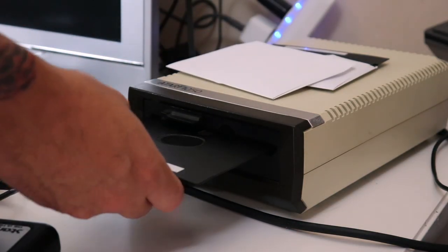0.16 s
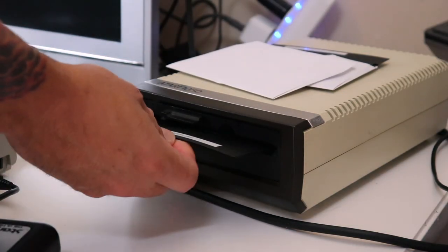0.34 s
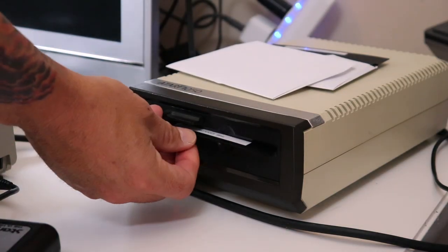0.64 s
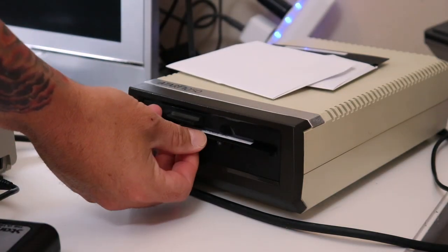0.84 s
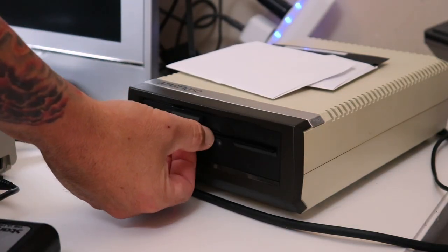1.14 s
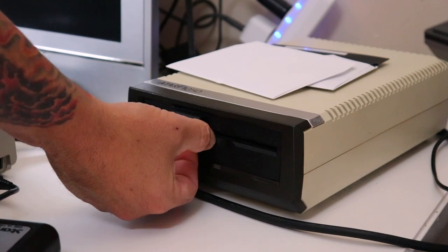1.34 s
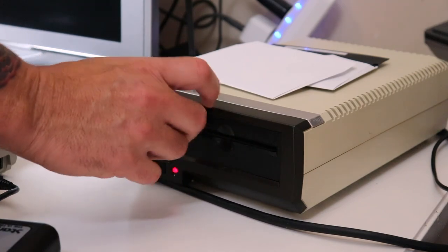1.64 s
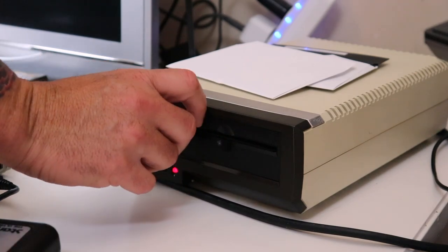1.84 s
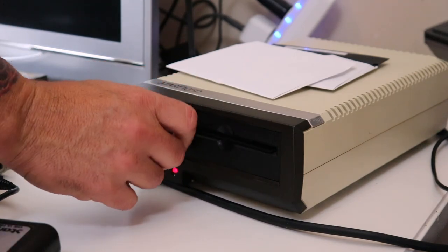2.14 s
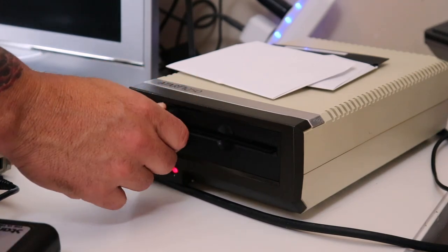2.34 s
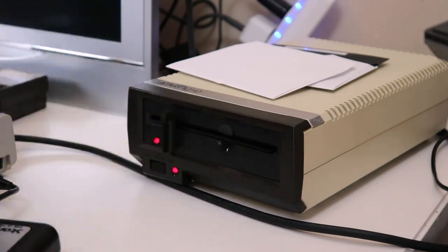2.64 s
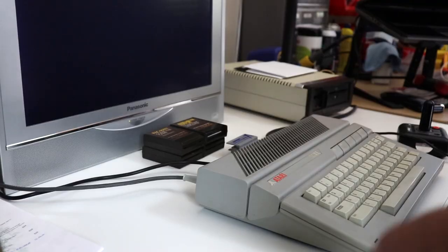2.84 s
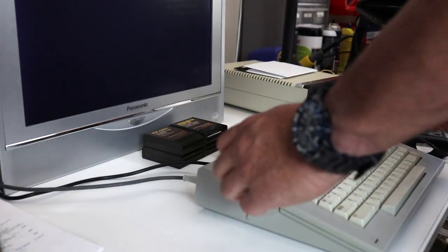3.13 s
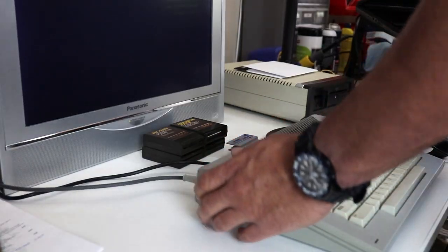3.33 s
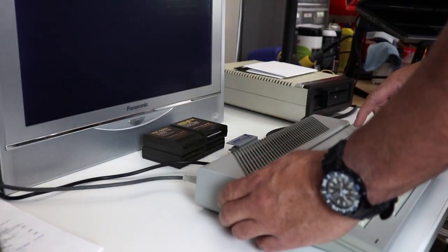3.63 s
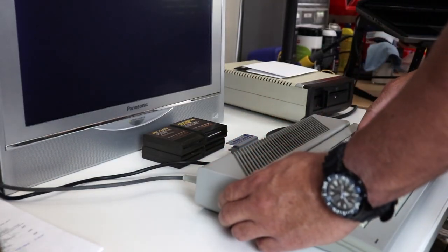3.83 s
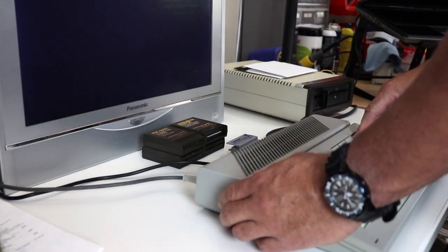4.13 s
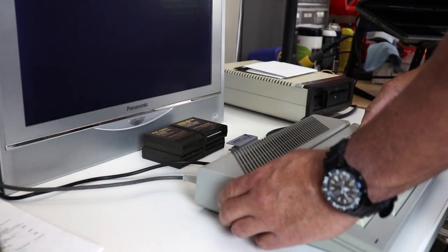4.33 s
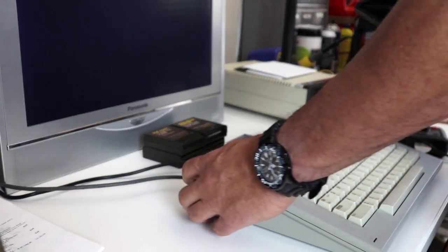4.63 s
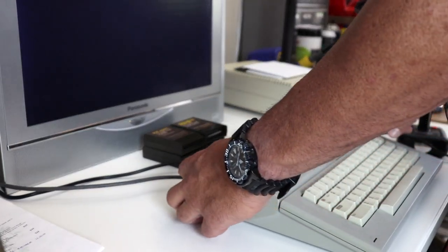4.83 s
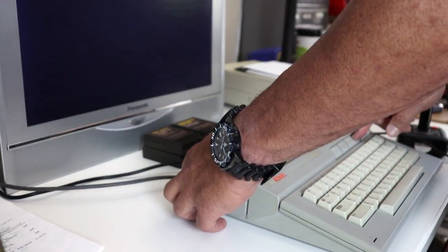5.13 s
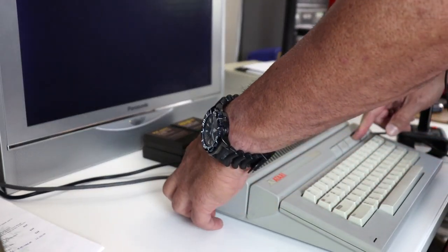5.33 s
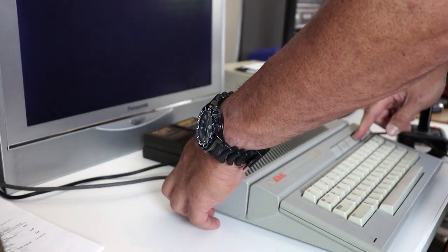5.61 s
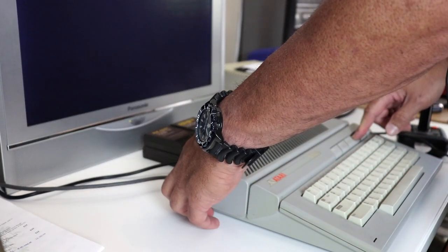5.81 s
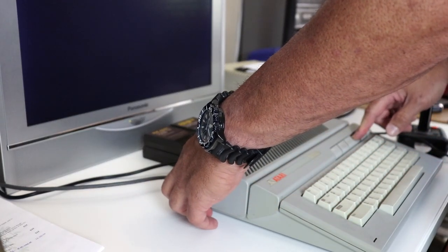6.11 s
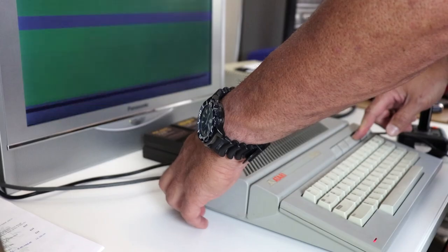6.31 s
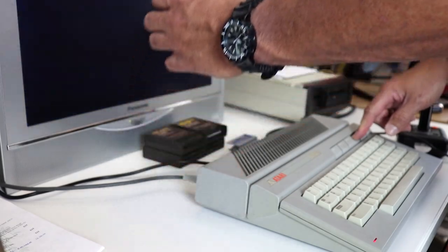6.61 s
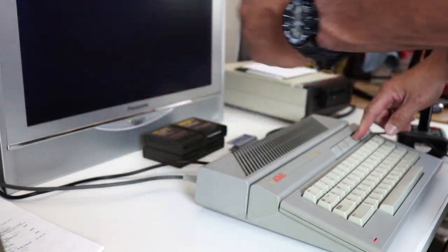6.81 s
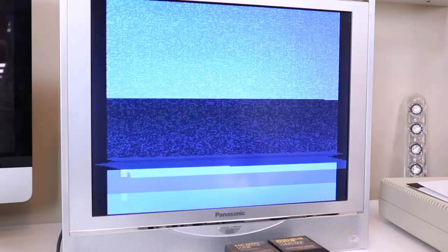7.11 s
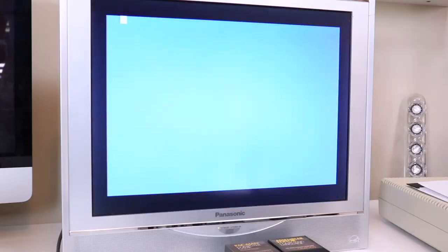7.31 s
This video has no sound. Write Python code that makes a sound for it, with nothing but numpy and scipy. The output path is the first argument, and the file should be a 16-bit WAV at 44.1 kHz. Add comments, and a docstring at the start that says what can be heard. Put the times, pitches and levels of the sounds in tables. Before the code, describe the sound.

Sharp plastic clicks and knocks of a disk drive, then a ragged piercing whine fades above quiet hum until a steadier screen whine takes over.

```python
"""In a small room, a floppy disk is pushed into a desktop drive, the latch turned and the drive switched on.
Struck modes make the clicks and knocks, band noise the rubbing, swelling tones the short judders of the
jacket and two faint long whistles. A thin whine from 11.35 kHz, an oscillator that turns ragged in spells,
hunts while a home computer is handled. Under it lie a soft whir of shaped noise and mains hum. Near the end
a monitor takes over from whir and whine, with a louder, steadier whine near 12 kHz over swelling hiss."""
import sys
import numpy as np
from scipy import signal
from scipy.fft import rfft, irfft, next_fast_len
from scipy.io import wavfile

SR = 44100
rng = np.random.default_rng(int(sys.argv[2]) if len(sys.argv) > 2 else 0)


def unload_wav(signal):
    """Save mono or channel-first audio to the path in sys.argv[1] as 16-bit WAV at rate SR, clipped to [-1, 1]."""
    wavfile.write(
        sys.argv[1],
        SR,
        np.round(np.clip(np.atleast_2d(signal).T, -1, 1) * 32767).astype(np.int16),
    )


N = 328986
TIME = np.arange(N) / SR   # s
MONITOR_S, HANDOVER_S = 7.135, 0.013   # the monitor takes over from whir and whine


def from_db(db):
    """Decibels to gain."""
    return 10 ** (np.asarray(db) / 20)


def rms_one(x):
    """Scale to rms 1."""
    return x / np.sqrt(np.mean(x ** 2) + 1e-30)


def in_time(rows):
    """Columns of a curve at every sample."""
    s, *columns = np.transpose(rows)
    return [np.interp(TIME, s, c) for c in columns]


def band(x, low_hz, high_hz, order=2):
    """Butterworth band-pass."""
    sos = signal.butter(order, [low_hz, min(high_hz, .45 * SR)], "band", fs=SR, output="sos")
    return signal.sosfilt(sos, x)


def ramp(start_s, length_s):
    """Rises from 0 to 1."""
    return np.clip((TIME - start_s) / max(length_s, 1e-4), 0, 1)


def envelope(start_s, end_s, attack_s, release_s):
    """Attack, hold and release, 0-1."""
    return ramp(start_s, attack_s) * (1 - ramp(end_s - release_s, release_s))


def waver(per_s):
    """Smooth chance of rms 1 that takes per_s new values a second."""
    steps = np.cumsum(np.ones(N) * per_s) / SR
    return rms_one(np.interp(steps, np.arange(N // 4), rng.standard_normal(N // 4)))


def spin(hz):
    """Unit phasor on a pitch curve."""
    return np.exp(2j * np.pi * np.cumsum(hz * np.ones(N)) / SR)


def tone(hz):
    """Sine of rms 1 on a pitch curve."""
    return np.sqrt(2) * spin(hz).imag


def room(x, t60=0.14, wet_db=-10, dull_hz=5000, width=0.052):
    """Desk and near walls answer with a short tail of decaying noise, almost alike in both channels."""
    t = TIME[:SR // 3]
    decay = np.exp(-np.log(1000) * t / t60) * (t > .004)
    mid, side = band(rng.standard_normal((2, len(t))), 200, dull_hz, order=1) * decay
    tail = (mid + width * np.outer([1, -1], side)) / np.linalg.norm(mid)
    return x + from_db(wet_db) * signal.fftconvolve(x[None], tail, axes=1)[:, :N]


# stereo width of the noise beds: (frequency [Hz], side re mid [dB])
NOISE_WIDTH = [(30, -12), (110, -18.5), (380, -17), (900, -15), (2000, -21.5), (4000, -35), (15000, -78)]


def wide(spectrum):
    """Stereo noise of a given spectrum, a little wide in the bass and centred in the treble."""
    hz, db = np.transpose(spectrum)
    width_hz, width_db = np.transpose(NOISE_WIDTH)
    size = next_fast_len(N)
    log_hz = np.log(np.maximum(np.arange(size // 2 + 1) * SR / size, 1))
    mid, side = rfft(rng.standard_normal((2, size))) * from_db(np.interp(log_hz, np.log(hz), db))
    side = side * from_db(np.interp(log_hz, np.log(width_hz), width_db))
    return rms_one(irfft([mid + side, mid - side], size)[:, :N])


# loudness of the whir before its band trims: (time [s], level [dB])
WHIR_LEVEL = [(0.0, -55), (0.61, -57), (1.8, -62), (2.3, -61.5), (2.68, -64), (3.77, -64.5), (4.56, -65.5),
              (5.73, -72), (6.78, -72), (7.12, -64.5)]
# spectrum of the whir: (frequency [Hz], relative level [dB])
WHIR_SPECTRUM = [(15, -46), (25, -24), (86, -5.5), (110, -2.5), (152, 0), (240, 0), (378, -2.5),
                 (523, -4.5), (762, -9), (1200, -10), (4150, -14.5), (9550, -18), (11200, -21.5),
                 (13500, -21.5), (15500, -24)]
# mains hum, before it wavers and follows the whir up and down: (frequency [Hz], level [dB])
MAINS_HUM = [(119.9, -73.5), (239.8, -77.5)]


def whir(low_db=0.17, middle_db=0.22, hiss_db=0.37):
    """Running machines: a low whir with mains hum, and a soft hiss above it."""
    level, = in_time(WHIR_LEVEL)
    air = wide(WHIR_SPECTRUM)
    # trim [dB], band edges [Hz], core that sets the loudness [Hz]
    bands = [(low_db, (20, 650), (60, 450)),
             (middle_db, (650, 3200), (900, 3000)),
             (hiss_db, (3200, 19000), (3500, 9500))]
    out = 0
    for db, edges, core in bands:
        loudness = np.std(band(air[0], *core, order=3))
        out = out + from_db(level + db) * band(air, *edges, order=3) / loudness
    hum = sum(from_db(db + 3.4 * waver(12)) * tone(hz + 1.51 * waver(10)) for hz, db in MAINS_HUM)
    hum = hum * from_db(level - np.mean(level))
    return (1 - ramp(MONITOR_S - HANDOVER_S, HANDOVER_S)) * (out + hum)


WAVERS_PER_S_PER_HZ = 3.4   # the wider it wavers, the faster


def oscillator(hz, waver_hz, clean, flutter_db, skew=0.089, knee=0.24):
    """An unsteady oscillation in the electronics: a clean tone that can break up into narrow hiss."""
    per_s, clean = WAVERS_PER_S_PER_HZ * waver_hz, np.clip(clean, 0, 1)
    swing = 0.69 * waver(per_s * 1.5) + .5 * waver(per_s * 4)
    swing = swing + skew * (swing ** 2 - np.mean(swing ** 2))   # it leaps further up than down
    steady = spin(hz + (10 + (1 - clean) * waver_hz / 3) * waver(250))
    ragged = spin(hz + waver_hz * swing)
    swirl = np.sqrt(clean) * steady + np.sqrt(1 - clean) * ragged
    held = rms_one((swirl / np.hypot(abs(swirl), knee)).imag)   # it saturates, so its height stays even
    return from_db(flutter_db * np.minimum(waver(per_s * 2), 1)) * held


def placed(x, pan_db, side_db=-21):
    """Panned, plus a faint copy one sample later with opposite sign in the two channels."""
    reflected = from_db(side_db) * np.roll(x, shift=1)
    return x * from_db(np.outer([.5, -.5], pan_db)) + np.outer([1, -1], reflected)


def side_tones(rows, edge_s=.0078):
    """Weak wavering tones that come and go."""
    out = 0
    for start, end, first_hz, last_hz, waver_hz, db in rows:
        glide = np.interp(TIME, [start, end], [first_hz, last_hz])
        sound = tone(glide + waver_hz * waver(900))
        out = out + from_db(db) * envelope(start, end, edge_s, edge_s) * sound
    return out


SPIT_START_S, SPIT_END_S, SPITS_PER_S = 4.7, 6.87, 35
SPIT_HZ, SPIT_WIDTH_HZ, SPIT_LENGTH_S = 11670, 1000, 0.0033
SPIT_START_DB, SPIT_GROWTH_DB = -66, 8   # ever harder


def spits(scatter_db=4):
    """Tiny random bursts of hiss just above the resting pitch of the whine."""
    scatter = from_db(scatter_db * np.clip(rng.standard_normal(N), -2, 2))
    born = (rng.random(N) < SPITS_PER_S / SR) * scatter
    bursts = signal.lfilter([1], [1, -np.exp(-1 / (SPIT_LENGTH_S * SR))], born + 1e-18)
    low_hz, high_hz = SPIT_HZ - SPIT_WIDTH_HZ / 2, SPIT_HZ + SPIT_WIDTH_HZ / 2
    hiss = rms_one(band(rng.standard_normal(N), low_hz, high_hz, order=1))
    growth = ramp(SPIT_START_S, SPIT_END_S - SPIT_START_S) ** 2
    level = from_db(SPIT_START_DB + SPIT_GROWTH_DB * growth)
    return (TIME > SPIT_START_S) * (TIME < SPIT_END_S) * level * bursts * hiss


# the whine before spells, sags and flutter: (time [s], level [dB], left re right [dB])
WHINE_STRENGTH = [(2.76, -38.5, 1.5), (3.99, -39, 0.5), (4.41, -41.5, 3.0), (4.98, -45, 3.0),
                  (5.1, -48, 4.0), (5.76, -57, 1.5), (6.6, -61, 1)]
# spells in which it jumps up and turns ragged: (start [s], end [s], edge [s], raggedness [0-1],
# pitch rise [Hz], waver [Hz], flutter [dB], swell [dB])
RAGGED_SPELLS = [(2.805, 3.43, .03, 1, 440, 450.5, 1, 0), (4.011, 4.614, 0.01, 1, 600, 244.8, 2.5, 0),
                 (6.631, 6.899, 0.037, 0.8, 22, 397, 5, 1), (6.872, 7.134, 0.0082, 1, 740, 252, 3.5, 20)]
# its pitch sags for an instant: (time [s], drop [Hz], swell [dB], length [s])
PITCH_SAGS = [(3.414, 690, -3, 0.0033), (3.923, 452, -3.5, 0.0062), (4.953, 353, -5, 0.0041),
              (5.463, 470, 11, 0.0021), (5.971, 846, 3.5, 0.0042), (6.485, 496, 6.5, 0.0056)]
# weak tones below the whine: (start [s], end [s], first pitch [Hz], last pitch [Hz], waver [Hz], level [dB])
LOWER_SIDE_TONES = [(2.738, 2.837, 7860, 7100, 186, -62.5), (3.432, 4.01, 7200, 7100, 220, -69),
                    (4.612, 6.607, 7400, 7500, 310, -74.5)]
MIRROR_DB = -1.5   # upper side tone re the lower
WHINE_START_S, WHINE_ATTACK_S = 2.733, 0.0071
REST_HZ, REST_WAVER_HZ, REST_FLUTTER_DB = 11350, 129, 1.4
SAG_WAVER_HZ = 349   # extra waver while it sags
CLEAN_WHEN_LOUD, CLEANER_PER_DB = 0.516, 0.34   # clean share 0-1; it steadies as it fades


def whine():
    """The whine rests on one pitch and slowly fades; in spells it jumps up, ragged, and at times it sags."""
    db, pan_db = in_time(WHINE_STRENGTH)
    hz, waver_hz, flutter_db = REST_HZ, REST_WAVER_HZ, REST_FLUTTER_DB
    clean = CLEAN_WHEN_LOUD + CLEANER_PER_DB * (db.max() - db)
    for start, end, edge_s, ragged, rise_hz, spell_waver_hz, spell_flutter_db, swell_db in RAGGED_SPELLS:
        on = envelope(start, end, edge_s, edge_s)
        hz, db, clean = hz + rise_hz * on, db + swell_db * on, clean * (1 - ragged * on)
        waver_hz = waver_hz + on * (spell_waver_hz - waver_hz)
        flutter_db = flutter_db + on * (spell_flutter_db - flutter_db)
    for s, drop_hz, swell_db, length_s in PITCH_SAGS:
        sag = np.exp(-np.minimum(((TIME - s) / length_s) ** 2, 20))
        hz, db = hz - drop_hz * sag, db + swell_db * sag
        clean, waver_hz = clean * (1 - sag), waver_hz + SAG_WAVER_HZ * sag
    sounding = envelope(WHINE_START_S, MONITOR_S + HANDOVER_S, WHINE_ATTACK_S, HANDOVER_S)
    main = sounding * from_db(db) * oscillator(hz, waver_hz, clean, flutter_db)
    # each side tone is mirrored above the resting pitch
    mirrored = [(start, end, 2 * REST_HZ - first, 2 * REST_HZ - last, spread, side_db + MIRROR_DB)
                for start, end, first, last, spread, side_db in LOWER_SIDE_TONES]
    beside = side_tones(LOWER_SIDE_TONES) + side_tones(mirrored) + spits()
    return placed(main + beside, pan_db)


# spectrum of the monitor's hiss: (frequency [Hz], relative level [dB])
MONITOR_SPECTRUM = [(18, -76), (30, -40), (126, -15), (532, -19.5), (767, -20), (897, -22.5), (2360, -28),
                    (10700, -25), (11600, -22), (12900, -18.5), (15500, -27)]
# weak tones of the monitor: (start [s], end [s], first pitch [Hz], last pitch [Hz], waver [Hz], level [dB])
MONITOR_SIDE_TONES = [(7.15, 7.47, 10080, 10200, 160, -56.5), (7.19, 7.47, 3950, 4210, 240, -62.5),
                      (7.17, 7.47, 5600, 6250, 330, -63.5)]
MONITOR_HZ, MONITOR_WAVER_HZ, MONITOR_CLEAN, MONITOR_FLUTTER_DB = 11998, 115, 0.99, 0.7
MONITOR_WHINE_DB, MONITOR_PAN_DB, MONITOR_ATTACK_S = -31, 1, 0.031
HISS_DB, HISS_RISE_DB, HISS_RISE_S = -44.5, 16, .14   # swells towards a steady level


def monitor(lumpy_db=3.0):
    """Beside the monitor: a steadier whine over a swelling hiss in which each region flickers by itself."""
    age = np.maximum(TIME - MONITOR_S, 0)
    swell = from_db(HISS_DB - HISS_RISE_DB * np.exp(-age / HISS_RISE_S))
    near = wide(MONITOR_SPECTRUM)
    regions = [20, 400, 1200, 3200, 5000, 8000, 19000]   # Hz
    hiss = swell * sum(from_db(lumpy_db * waver(45)) * band(near, low, high, order=3)
                       for low, high in zip(regions, regions[1:]))
    whistle = oscillator(MONITOR_HZ, MONITOR_WAVER_HZ, MONITOR_CLEAN, MONITOR_FLUTTER_DB)
    tones = from_db(MONITOR_WHINE_DB) * whistle + side_tones(MONITOR_SIDE_TONES)
    return ramp(MONITOR_S, MONITOR_ATTACK_S) * (hiss + placed(tones, MONITOR_PAN_DB))


# fingers and disk jacket rub on the case: (start [s], attack [s], release [s], level [dB], resonance [Hz])
CASE_RUBS = [(1.03, 0.09, .03, -51.5, 540), (2.497, .008, 0.24, -49, 745), (7.345, .012, 0.032, -54, 756),
             (7.41, .05, .05, -58, 840)]


def rubbing(width_hz=130):
    """Friction keeps one broad resonance of the case sounding: slow noise shifted up to its pitch."""
    grain = band(rng.standard_normal((2, N)), 0.76, width_hz, order=2)
    out = 0
    for s, attack_s, release_s, db, hz in CASE_RUBS:
        shifted = ((grain[0] + 1j * grain[1]) * spin(hz)).real
        resonance = rms_one(band(shifted, 360, 2400))
        out = out + from_db(db) * envelope(s, s + attack_s + release_s, attack_s, release_s) * resonance
    return out


# short judders of the jacket, then two faint long whistling tones near 505 and 1000 Hz:
# (start [s], length [s], centre pitch [Hz], level at the crest [dB])
JUDDERS_AND_WHISTLES = [(0.485, 0.023, 532.6, -35.5), (0.502, 0.057, 529, -38.5), (0.558, 0.039, 530, -53),
                        (0.592, 0.014, 545, -42.5), (1.39, 0.47, 507.3, -60.5), (1.418, 0.38, 997, -65.5)]


def judders_and_whistles(waver_hz=28, rough_db=1.5):
    """Rough wavering tones that swell and fade: short judders of the jacket, then two faint long whistles."""
    out = 0
    for s, length_s, hz, db in JUDDERS_AND_WHISTLES:
        swell = np.sin(np.pi * np.clip((TIME - s) / length_s, 0, 1))
        out = out + swell * from_db(db + rough_db * waver(200)) * tone(hz + waver_hz * waver(200))
    return out


def ring(push, hz, t60):
    """One decaying mode."""
    r, w = np.exp(-np.log(1000) / (t60 * SR)), 2 * np.pi * hz / SR
    return signal.lfilter([0, np.sin(w)], [1, -2 * r * np.cos(w), r * r], push + 1e-18)


def register_levels(registers, knock_db, click_db, click_hz, dullness_db, below_db):
    """The lowest register carries the knock; the others fall away on both sides of the one that clicks."""
    steps = np.arange(1, len(registers) - 1) - (np.searchsorted(registers, click_hz) - 1)
    return [knock_db, *(click_db - np.where(steps > 0, dullness_db, below_db) * abs(steps))]


def contacts(hits, modes, registers, focus_db, favour_db, grit, rise_s, dense_db, dense_t60, below_db):
    """Each contact is a push and a short chatter; the place that is struck picks the modes that ring most."""
    out, t = np.zeros(N + SR), TIME[:SR // 4]
    for s, low_ring, high_ring, ring_length, chatter_s, knock_db, click_db, dullness_db in hits:
        strengths = register_levels(registers, knock_db, click_db, high_ring, dullness_db, below_db)
        push = grit * rng.standard_normal(len(t)) * np.exp(-t / max(chatter_s, 1e-4))
        push[0] += 1
        for db, low, high in zip(strengths, registers, registers[1:]):
            sound = 0
            for k, (hz, mode_db, t60) in enumerate(modes):
                if low <= hz < high:
                    favour = favour_db * np.exp(-(10 * np.log2(hz / high_ring)) ** 2)
                    loss = focus_db * min(abs(np.log2(hz / low_ring)), .5)
                    gain = (-1) ** k * from_db(mode_db + favour - loss)   # signs alternate
                    sound = sound + gain * ring(push, hz, t60 * ring_length)
            # countless weak modes fill the gaps, more of them towards the treble
            dense = band(rng.standard_normal(len(t)), low * 1.2, high * .93, order=3)
            dense = rms_one(dense * from_db(-60 * t / dense_t60))
            sound = rms_one(sound) + from_db(dense_db) * min(low / 2000, 1) * dense
            sound = sound * (1 - np.exp(-t / rise_s))   # the panels take a moment to build up
            sound = band(sound, low, 2 * high)   # small panels radiate no bass
            at = round(s * SR)
            out[at:at + len(t)] += from_db(db) * sound / np.std(sound[:SR // 32])
    return out[:N]


# contacts on the computer: (time [s], low ring [Hz], high ring [Hz], ring length [factor], chatter [s],
# knock level [dB], click level [dB], dullness [dB per register above the click])
COMPUTER_CONTACTS = [(3.0, 705, 1900, .56, .0035, -60.5, -81, 2),
                     (3.933, 870, 2400, 0.46, 0.0063, -58.5, -65, 2),
                     (4.94, 1010, 2400, 0.49, .0022, -70, -77, 4),
                     (6.253, 1200, 3250, .76, 0.0026, -69.5, -70, 0),
                     (6.274, 1250, 1880, 1, 0.0022, -67, -50.5, 5),
                     (6.4375, 1050, 1700, 0.76, 0.003, -47.5, -82, 0),
                     (6.931, 900, 4700, .43, 0.0016, -82, -61, 0),
                     (7.112, 900, 3080, 1, 0.00094, -84, -54, 0)]
# computer shell and keys: (frequency [Hz], relative level [dB], t60 before the ring length factor [s])
COMPUTER_SHELL = [(720, -1, 0.054), (915, -3, 0.026), (1068, 3.5, 0.022), (1110, 4.5, 0.019),
                  (1230, -5.5, 0.078), (1710, 6.5, 0.023), (1890, -6.5, 0.055), (2030, 1, 0.047),
                  (2370, 6, 0.025), (2860, 11, 0.011), (3130, 11, 0.015), (4750, 2, 0.025),
                  (5270, -22, 0.0047)]
# register edges: (frequency [Hz])
COMPUTER_EDGES = [500, 1450, 2600, 6500]


def computer_handling():
    """Contacts ring the shell and keys of the computer."""
    return contacts(COMPUTER_CONTACTS, COMPUTER_SHELL, COMPUTER_EDGES, focus_db=29.5, favour_db=8,
                    grit=0.12, rise_s=0.00062, dense_db=-7.0, dense_t60=0.014, below_db=15)


# contacts on the drive: (time [s], low ring [Hz], high ring [Hz], ring length [factor], chatter [s],
# knock level [dB], click level [dB], dullness [dB per register above the click])
DRIVE_CONTACTS = [(.312, 786, 4850, 0.35, 0.0029, -49.5, -58, 14.5),
                  (.325, 526, 5270, .57, 0.0045, -52, -46, 27),
                  (.332, 744, 2150, 0.79, 0.0026, -51.5, -44.5, 16),
                  (.3495, 720, 2800, 0.32, 0.0045, -49, -42, 3),
                  (.621, 554, 2080, 0.91, 0.0037, -54, -53.5, 17),
                  (.756, 754, 4080, .4, 0.0025, -45, -52.5, 14),
                  (.760, 803, 1650, .8, 0.0032, -44.5, -39, 11),
                  (1.332, 730, 2540, 0.29, 0.0086, -63, -46.5, 4),
                  (1.339, 730, 7770, 0.31, 0.016, -57, -43.5, -6),
                  (1.517, 523, 1780, 0.72, 0.0092, -62, -57.5, 7),
                  (1.823, 470, 1310, .7, 0.0053, -49.5, -75, 9), (1.825, 648, 1300, 1, 0.0042, -43, -75, 7),
                  (1.854, 650, 1300, 0.84, 0.0043, -44.5, -75, 7),
                  (2.065, 620, 2190, 0.58, 0.028, -68, -54, 16), (2.111, 605, 4670, 1, .005, -70, -59, 9),
                  (2.3615, 624, 2940, .27, 0.0037, -43, -41, 10.5),
                  (2.364, 520, 2210, 0.3, 0.0017, -46, -39.5, 12.5),
                  (2.370, 646, 1480, .8, 0.0026, -44.5, -44.5, 5)]
# drive case and latch: (frequency [Hz], relative level [dB], t60 before the ring length factor [s])
DRIVE_CASE = [(395, -4, .05), (460, -4, .06), (520, 0, .09), (590, -4, .05), (650, 1, .08), (730, -4, .05),
              (810, -4, .06), (1050, -8, .03), (1340, -6, .04), (1495, -1, .07), (1625, 0, .06),
              (1800, -8, .03), (2090, -1, .06), (2230, -3, .05), (2340, 0, .08), (2520, -3, .03),
              (2680, 0, .06), (2800, -3, .05), (3050, -6, .03), (3290, -3, .04), (3480, -7, .03),
              (4080, -6, .03), (4700, -2, .03), (5020, 0, .04), (5320, 0, .04), (5850, -4, .03),
              (7500, 0, .025), (7900, -1, .02), (8350, 0, .025), (9600, -4, .01), (11500, -4, .008),
              (13500, -5, .008)]
# register edges: (frequency [Hz])
DRIVE_EDGES = [300, 1000, 1900, 3700, 6500, 14000]


def drive_handling():
    """Disk, latch and switch knock and click: contacts ring the case and latch of the drive."""
    return contacts(DRIVE_CONTACTS, DRIVE_CASE, DRIVE_EDGES, focus_db=45, favour_db=15,
                    grit=0.2, rise_s=0.0014, dense_db=-10, dense_t60=0.03, below_db=11)


def scene():
    """Handling sounds and faint whistles in the room, over whir, whine and monitor."""
    handling = drive_handling() + computer_handling() + rubbing()
    return room(handling + judders_and_whistles()) + whir() + whine() + monitor()


CUTOFF_HZ = 15800


def record(dry):
    """The top is cut steeply."""
    return signal.sosfilt(signal.ellip(12, .1, 80, CUTOFF_HZ, fs=SR, output="sos"), dry)


dry = scene()
out = record(dry)
unload_wav(out)
```